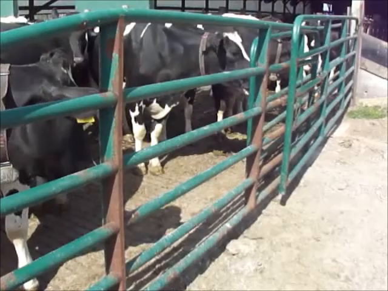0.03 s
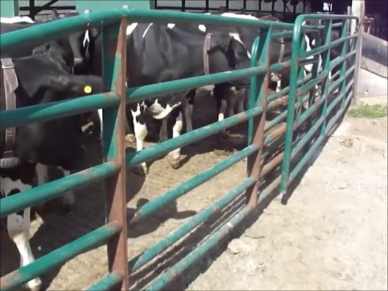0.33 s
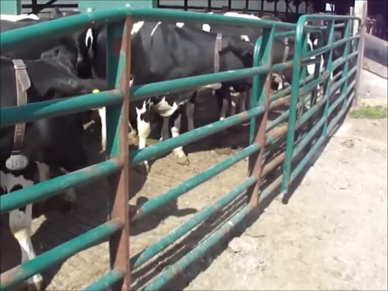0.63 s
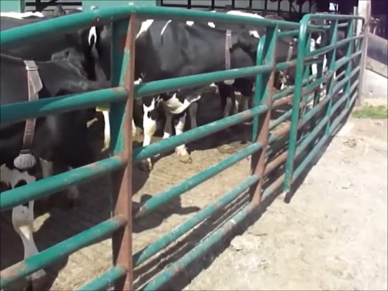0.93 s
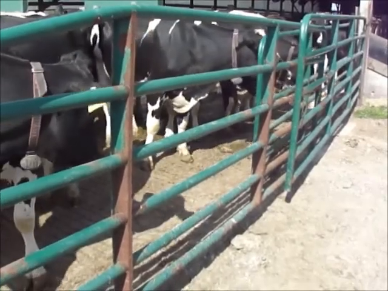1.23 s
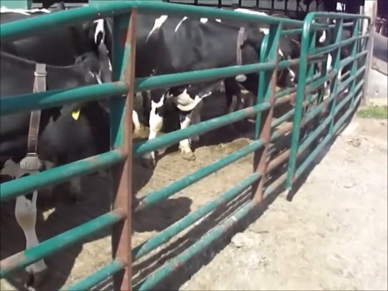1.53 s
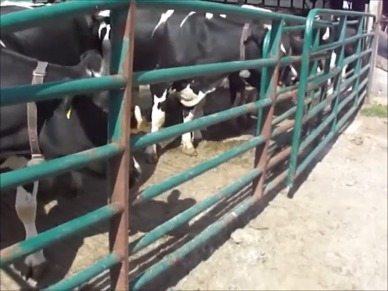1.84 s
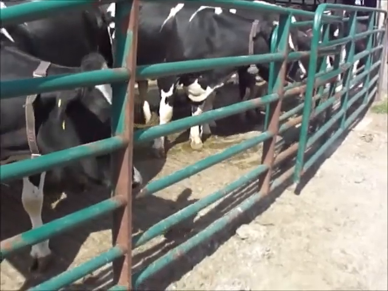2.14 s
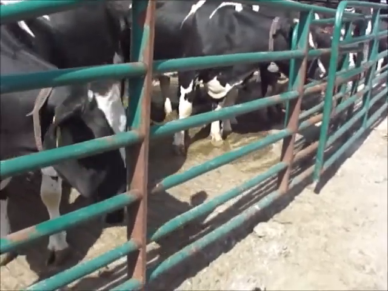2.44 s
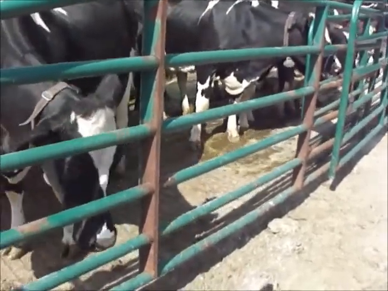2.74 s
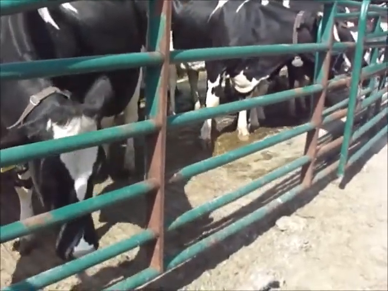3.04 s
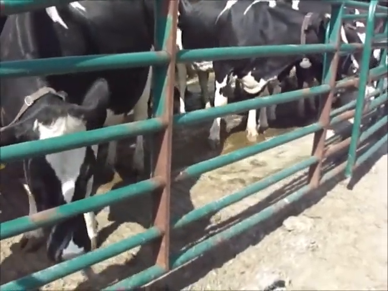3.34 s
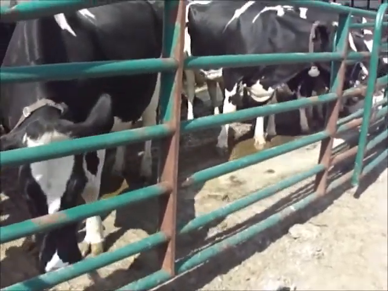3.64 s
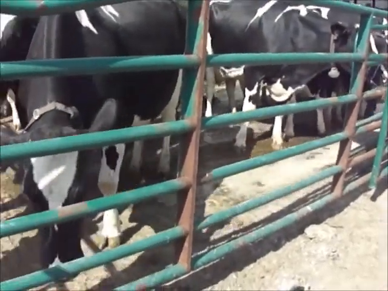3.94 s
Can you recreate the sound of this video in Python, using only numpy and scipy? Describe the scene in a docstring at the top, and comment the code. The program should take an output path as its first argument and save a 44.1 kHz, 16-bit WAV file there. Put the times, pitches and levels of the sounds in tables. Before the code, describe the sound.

Running water washes steadily over concrete at an open barn, with gurgles and ticking spray. Wind briefly thumps the microphone early on, and the flow grows a little louder, slopping and splashing toward the end.

```python
"""Flush water in a cattle barn.

Water rushes over the concrete floor and slowly comes nearer: a wide wash with ticking
spray, ringing bubbles and a few larger slops and splashes. A breeze rumbles and a short
gust buffets the microphone; a machine hums faintly far off. Mono."""
import sys
import numpy as np
from scipy import signal
from scipy.fft import rfft, irfft
from scipy.io import wavfile
from scipy.ndimage import uniform_filter1d

SR = 44100
rng = np.random.default_rng(int(sys.argv[2]) if len(sys.argv) > 2 else 0)


def int16_out(signal):
    """Quantize to a 16-bit WAV file."""
    q = np.round(np.clip(np.atleast_2d(signal).T, -1, 1) * 32767)
    wavfile.write(sys.argv[1], SR, q.astype(np.int16))


N = 176400  # 4 s


def amp(db):
    """Decibels to gain."""
    return 10 ** (np.asarray(db) / 20)


def unit(x):
    """Scale to rms 1."""
    return x / np.sqrt(np.mean(x ** 2) + 1e-20)


def curve(points):
    """Interpolate (time [s], value) points per sample."""
    return np.interp(np.arange(N) / SR, *np.transpose(points))


def colour(x, points):
    """Filter by (frequency [Hz], gain [dB]) points."""
    hz, db = np.transpose(points)
    bins_hz = np.fft.rfftfreq(len(x), 1 / SR)
    gain_db = np.interp(np.log(bins_hz + 1), np.log(hz), db)
    return irfft(rfft(x) * amp(gain_db), len(x))


def add(mix, start_s, sound):
    """Mix a sound in at start_s."""
    part = mix[max(round(start_s * SR), 0):][:len(sound)]
    part += sound[:len(part)]


def impacts(per_s, spread_db):
    """Random clicks, many small, a few large."""
    size = amp(spread_db * np.minimum(rng.exponential(1, N), 4))
    return size * rng.choice([-1, 1], N) * (rng.random(N) < per_s / SR)


def burst(rise_s, hz, width_oct, level_db):
    """Puff of turbulence: a noise band that swells and dies."""
    t = np.arange(SR // 2) / SR
    bins_hz = np.fft.rfftfreq(len(t), 1 / SR) + 1
    band = np.exp(-.5 * (np.log2(bins_hz / hz) / width_oct) ** 2)
    noise = irfft(rfft(rng.standard_normal(len(t))) * band, len(t))
    envelope = t / rise_s * np.exp(1 - t / rise_s)
    return amp(level_db) * unit(noise * envelope) * np.sqrt(np.mean(envelope ** 2))


# Nearness of the water (time [s], gain [dB])
WASH_NEARNESS = [(0, -1.7), (1.0, -1.5), (1.8, -1.66), (2.2, -0.1), (2.6, 0.7), (3.1, 0.1), (3.6, 0),
                 (4, 0)]
# Wash spectrum (frequency [Hz], gain [dB])
WASH_SPECTRUM = [(25, -49), (60, -27.5), (120, -15.5), (230, -7), (330, -5.5), (520, 0.5), (660, 1.7),
                 (830, -3.6), (1150, 0), (1500, -3.5), (2000, -3.5), (2600, -4.5), (4000, -11.5),
                 (6300, -19.5), (9000, -32.5), (11000, -42)]


def wash(patch_hz=450, patch_s=0.054, patch_db=1, swell_db=.5):
    """Sheet of running water: a wide rush with drifting spectral patches and a slight swell."""
    window, hop = 512, 128
    frames = dict(nperseg=window, noverlap=window - hop)
    spectra = signal.stft(rng.standard_normal(N), **frames)[2]
    patches = uniform_filter1d(rng.standard_normal(spectra.shape), round(patch_hz * window / SR), axis=0)
    patches = unit(uniform_filter1d(patches, round(patch_s * SR / hop), axis=1))
    swell = unit(uniform_filter1d(rng.standard_normal(spectra.shape[1]), size=30))
    spectra *= amp(patch_db * patches + swell_db * swell)
    rush = signal.istft(spectra, **frames)[1][:N]
    return amp(-28 + curve(WASH_NEARNESS)) * unit(colour(rush, WASH_SPECTRUM))


# Gurgling strength (time [s], gain [dB])
CHURN_GAIN = [(0, -4), (1.0, -3), (2.0, -1.2), (2.6, -0.5), (3.1, 2.2), (3.35, 0.5), (3.6, 1.3),
              (3.78, 0.5), (4, 6)]
# Bubble families (centre pitch [Hz], spread [oct], rate [1/s], decay [cycles],
# base level [dB], share of churn gain [ratio])
BUBBLE_FAMILIES = [(649.7, 0.2425, 620, 4.54, -34.5, 0.96), (1088, 0.251, 340, 7, -37.5, 0.61),
                   (2204, 0.435, 600, 11.1, -41, .1)]


def bubbles(centre_hz, spread_oct, per_s, decay_cycles, level_db, churn_share):
    """One bubble family: trapped air rings briefly, rising a little in pitch."""
    pitch_count, rise_per_decay = 40, 0.037
    t = np.arange(SR // 10) / SR
    out = np.zeros(N)
    quantiles = (np.arange(pitch_count) + rng.random(pitch_count)) / pitch_count
    offsets_oct = spread_oct * np.sqrt(2) * np.arcsin(2 * quantiles - 1)
    for hz in centre_hz * 2 ** offsets_oct:
        decays = t * hz / decay_cycles
        phase = 2 * np.pi * np.cumsum(hz * (1 + rise_per_decay * decays)) / SR
        attack = 1 - np.exp(-2 * t * hz)
        ring = np.sin(phase) * attack * np.exp(-decays)
        out += signal.oaconvolve(impacts(per_s / pitch_count, spread_db=2.5), ring)[:N]
    return amp(level_db + churn_share * curve(CHURN_GAIN)) * unit(out)


# Spray spectrum (frequency [Hz], gain [dB])
SPRAY_SPECTRUM = [(100, -26), (400, -10), (1100, 1.5), (1800, 1), (2700, -4), (4000, -7), (6300, -17.5),
                  (9000, -26.5), (11000, -34.5)]
# Spray strength (time [s], gain [dB])
SPRAY_GAIN = [(0, -2), (.75, -2), (1.7, -2), (2.2, .3), (2.7, -2), (2.95, 3), (3.55, 0), (3.75, 1.5),
              (4, 0)]


def spray():
    """Drops and bursting foam tick on the concrete."""
    ticks = colour(impacts(per_s=2500, spread_db=3.5), SPRAY_SPECTRUM)
    return amp(-34.5 + curve(SPRAY_GAIN)) * unit(ticks)


# Larger slops (time [s], pitch [Hz], level [dB])
SLOP_EVENTS = [(1.556, 1270, -31.5), (1.6, 1130, -32), (1.635, 575, -26), (2.012, 1200, -32.5),
               (2.118, 1130, -24.5), (2.142, 584, -31), (2.235, 1080, -30), (2.243, 600, -29.5),
               (2.33, 1090, -36), (2.505, 676, -27), (2.548, 565, -28.5), (2.992, 694, -24.5),
               (3.455, 1140, -27.5), (3.708, 685, -25), (3.76, 650, -25), (3.823, 616, -24.5),
               (3.86, 590, -30), (3.935, 515, -26), (3.94, 1200, -29.5)]


def slops(rise_s=0.0089, width_oct=0.18):
    """Small waves fold over with a hollow slop."""
    out = np.zeros(N)
    for start_s, hz, level_db in SLOP_EVENTS:
        add(out, start_s, burst(rise_s, hz, width_oct, level_db))
    return out


# Splashes (time [s], rise [s], pitch [Hz], width [oct], level [dB])
SPLASH_EVENTS = [(.705, .002, 8000, .4, -49), (2.925, 0.015, 6000, 0.44, -47), (3.17, .006, 7500, .35, -48),
                 (3.445, 0.0086, 5800, .4, -41.5), (3.468, 0.0014, 4240, 0.16, -25.5),
                 (3.473, 0.013, 5000, .4, -37.5), (3.58, .002, 9000, .2, -48)]


def splashes():
    """Water splashes brightly, perhaps under hooves."""
    out = np.zeros(N)
    for start_s, *splash in SPLASH_EVENTS:
        add(out, start_s, burst(*splash))
    return out


# Breeze rumble (time [s], level [dB])
BREEZE_LEVEL = [(0, -62), (.8, -56), (1.4, -52), (1.6, -68), (2.5, -68), (2.85, -53), (3.3, -57), (4, -61)]
# Breeze spectrum (frequency [Hz], gain [dB])
BREEZE_SPECTRUM = [(20, -17), (45, -7), (75, 5), (130, -4), (300, -20), (1000, -70)]
# Wind buffets (time [s], rise [s], pitch [Hz], width [oct], level [dB])
BUFFET_EVENTS = [(0.096, 0.024, 230, 0.34, -40), (0.994, 0.012, 180, 0.32, -27.5),
                 (1.04, 0.019, 115, 0.46, -40), (1.142, 0.0098, 172.5, 0.36, -20.5),
                 (1.152, 0.0067, 332, 1, -24.5), (1.182, 0.014, 216, 0.26, -25),
                 (1.221, 0.011, 176, 0.25, -29), (1.28, 0.048, 154, 0.51, -38),
                 (1.384, .015, 149, 0.2, -35), (1.494, .008, 109, .25, -41), (2.765, 0.013, 102, 0.13, -40),
                 (3.52, 0.0091, 104, 0.13, -38)]


def wind():
    """A light breeze rumbles on the microphone; eddies thump on it."""
    rumble = unit(colour(rng.standard_normal(N), BREEZE_SPECTRUM))
    out = amp(curve(BREEZE_LEVEL)) * rumble
    for start_s, *buffet in BUFFET_EVENTS:
        add(out, start_s, burst(*buffet))
    return out


# Hum, rising after the gust (time [s], level [dB])
MACHINE_LEVEL = [(0, -64), (1.1, -62), (1.6, -57), (4, -60)]


def machine_hum(hz=102.3):
    """A distant machine hums on one low tone."""
    tone = np.sin(2 * np.pi * hz * np.arange(N) / SR)
    return amp(curve(MACHINE_LEVEL)) * unit(tone)


def barn(x, t60_s=0.23, wet_db=-6):
    """Add short scatter from the floor, animals and open shed."""
    t = np.arange(SR // 2) / SR
    tail = rng.standard_normal(len(t)) * np.exp(-np.log(1000) * t / t60_s)
    return x + amp(wet_db) * signal.fftconvolve(x, tail / np.linalg.norm(tail))[:N]


def scene():
    """Water, wind and hum, identical in both channels."""
    froth = spray() + sum(bubbles(*family) for family in BUBBLE_FAMILIES)
    mono = wash() + barn(froth) + slops() + splashes() + wind() + machine_hum()
    return np.array([mono, mono])


# Treble, dulling at the end (time [s], gain [dB])
TREBLE_GAIN = [(3.7, 4), (3.82, 3.5), (3.92, -4), (4, -1)]


def record(dry, treble_hz=7500, silence_s=.072, fade_s=0.0048, cutoff_hz=11050):
    """Shape the treble, fade in after a brief silence, band-limit."""
    low = signal.sosfiltfilt(signal.butter(4, treble_hz, fs=SR, output="sos"), dry)
    toned = low + amp(curve(TREBLE_GAIN)) * (dry - low)
    fade_in = np.clip((np.arange(N) / SR - silence_s) / fade_s, 0, 1)
    lowpass = signal.firwin(1023, cutoff_hz, window=("kaiser", 9), fs=SR)
    return signal.oaconvolve(toned * fade_in, lowpass[None], "same")


dry = scene()
out = record(dry)
int16_out(out)
```